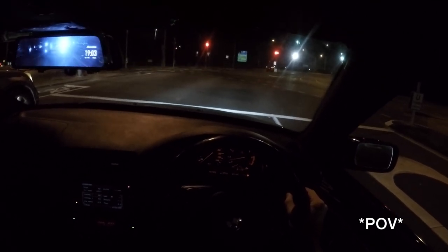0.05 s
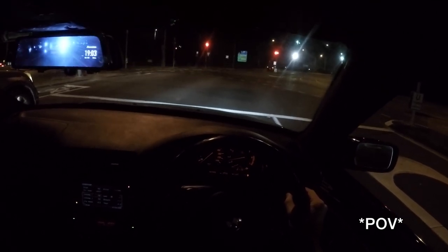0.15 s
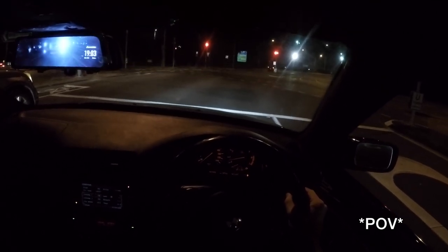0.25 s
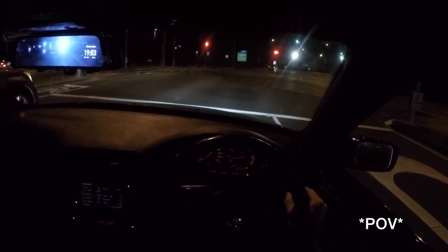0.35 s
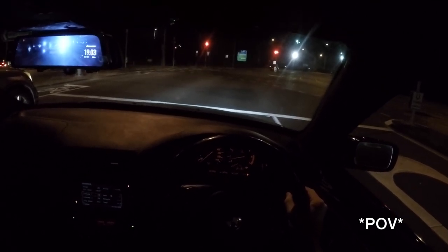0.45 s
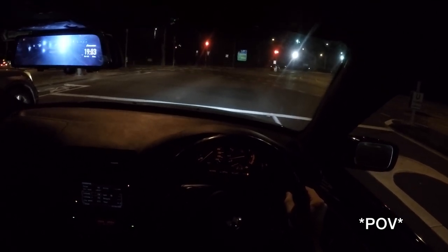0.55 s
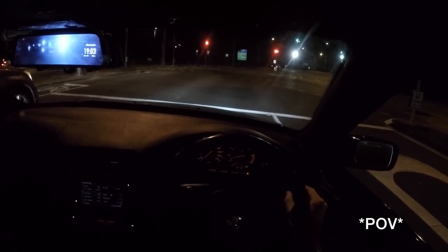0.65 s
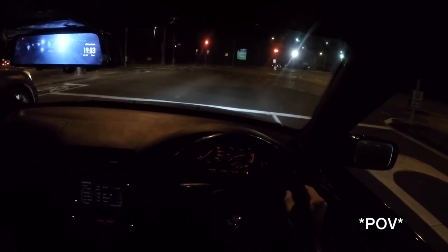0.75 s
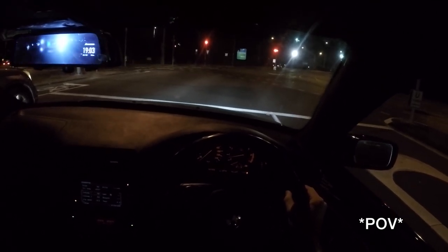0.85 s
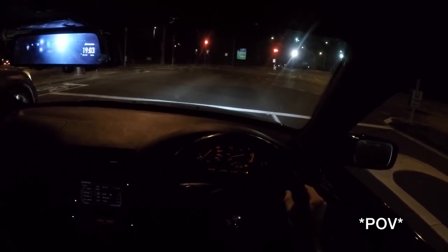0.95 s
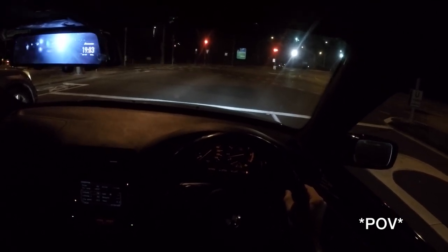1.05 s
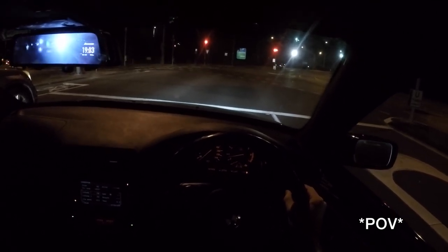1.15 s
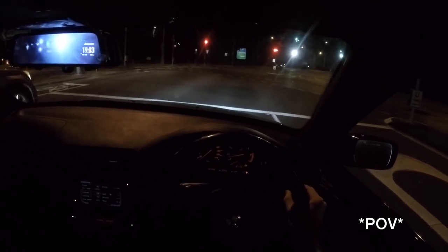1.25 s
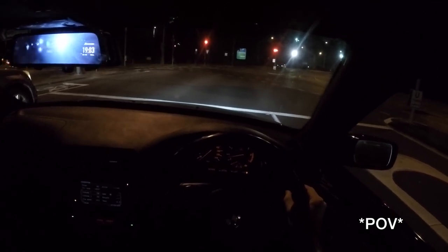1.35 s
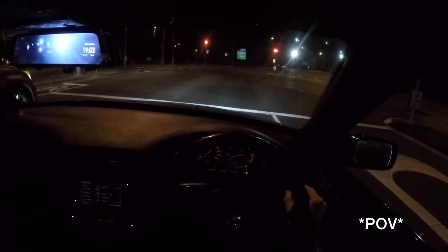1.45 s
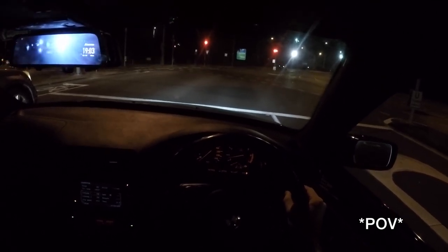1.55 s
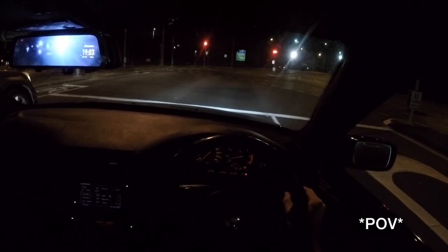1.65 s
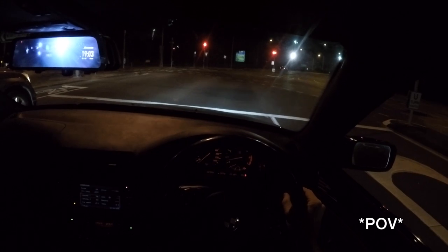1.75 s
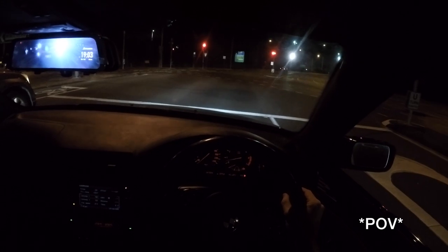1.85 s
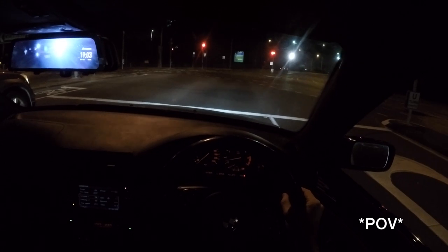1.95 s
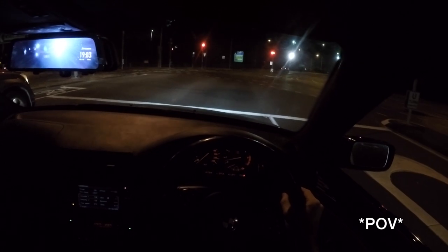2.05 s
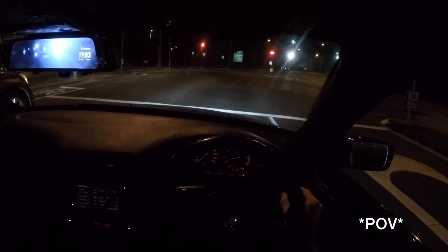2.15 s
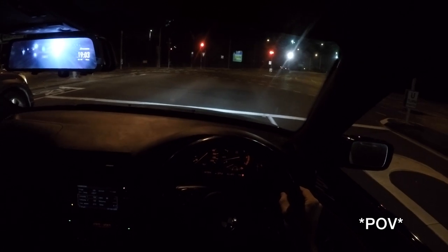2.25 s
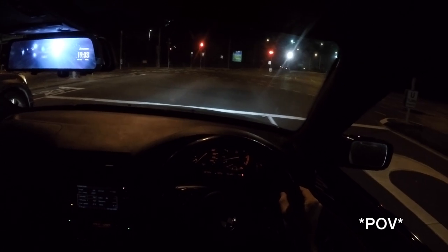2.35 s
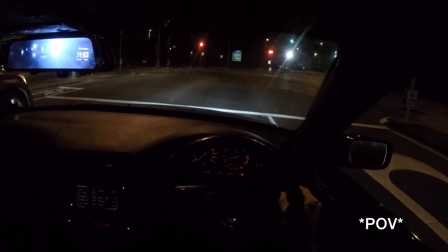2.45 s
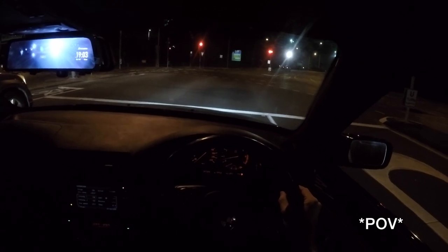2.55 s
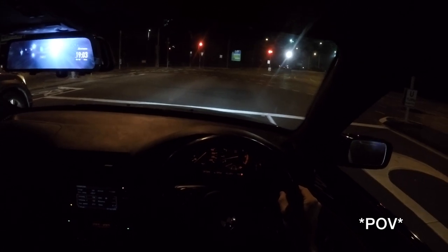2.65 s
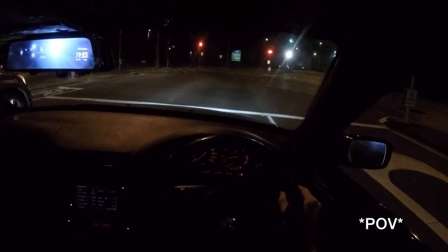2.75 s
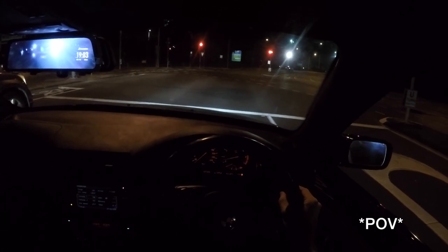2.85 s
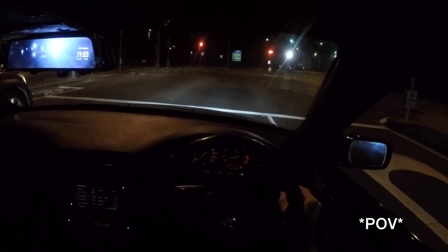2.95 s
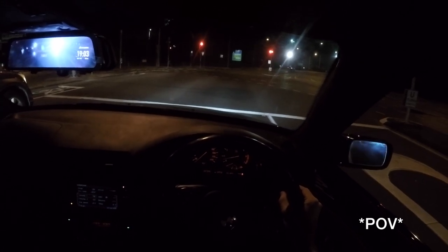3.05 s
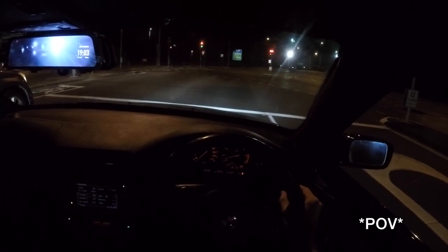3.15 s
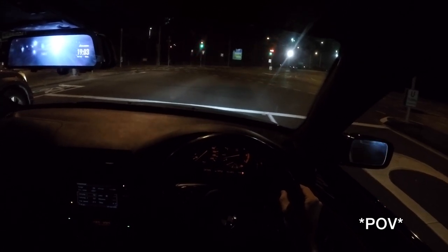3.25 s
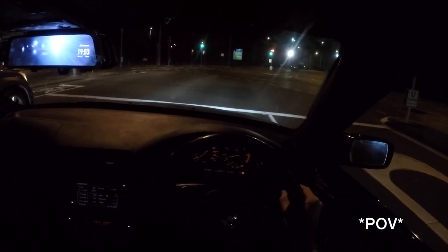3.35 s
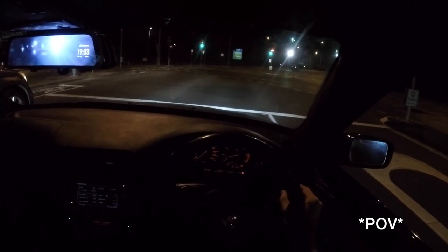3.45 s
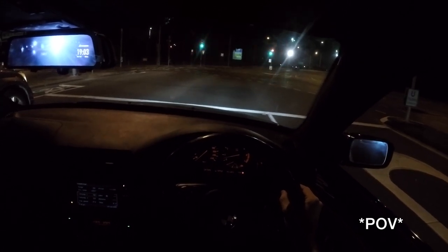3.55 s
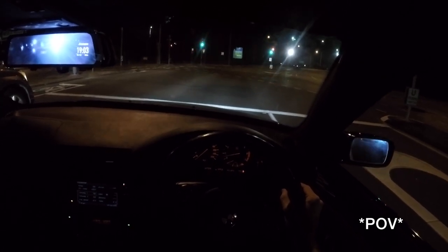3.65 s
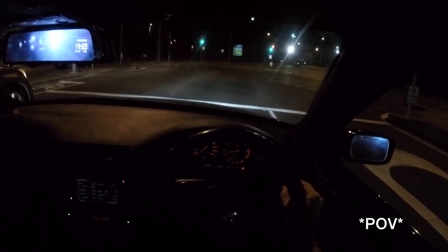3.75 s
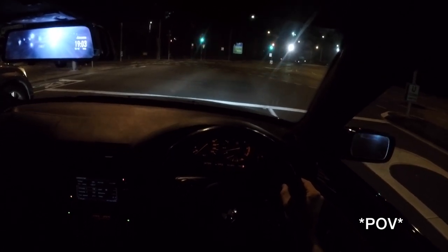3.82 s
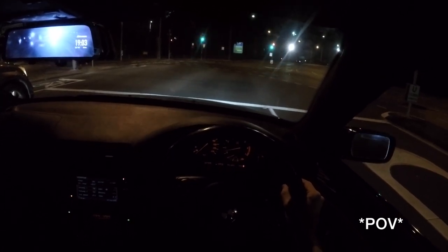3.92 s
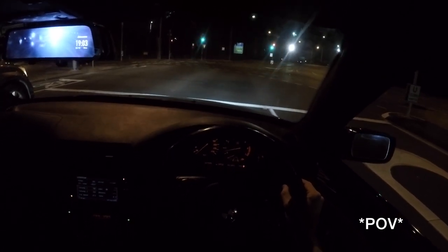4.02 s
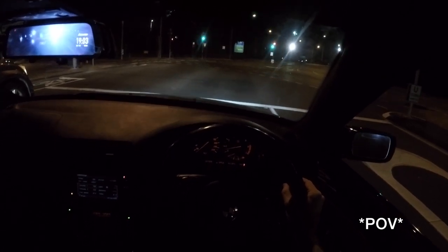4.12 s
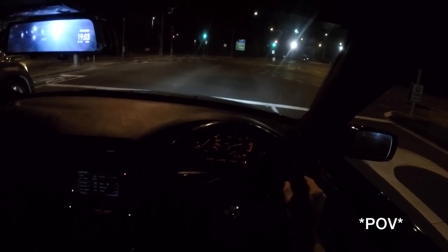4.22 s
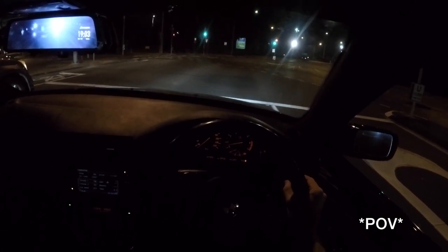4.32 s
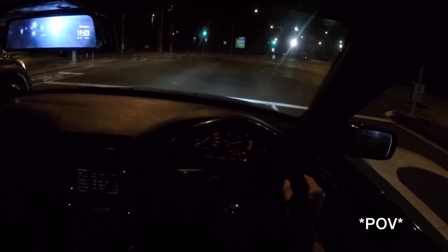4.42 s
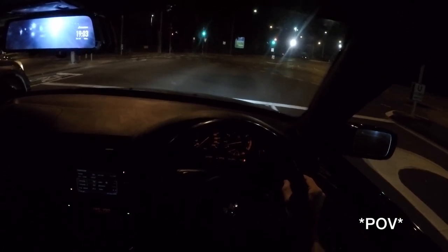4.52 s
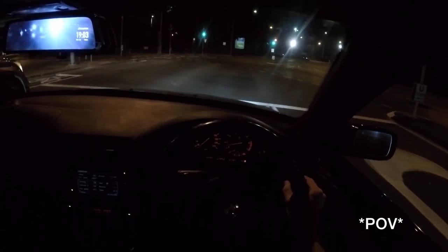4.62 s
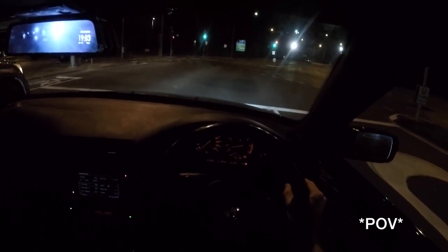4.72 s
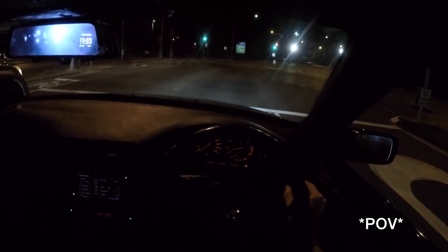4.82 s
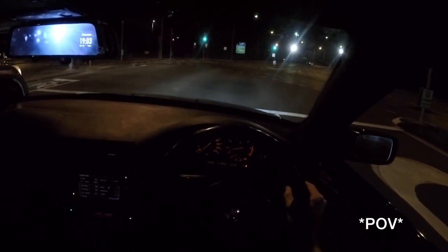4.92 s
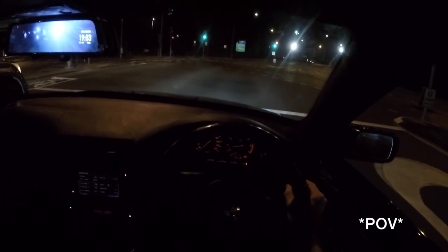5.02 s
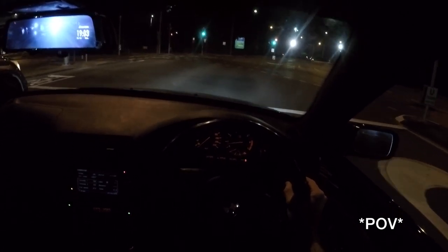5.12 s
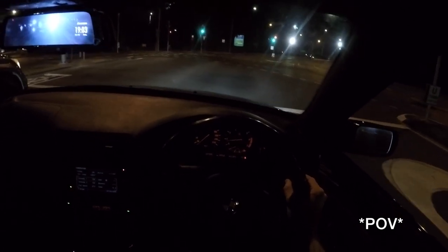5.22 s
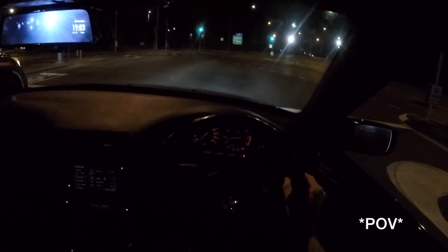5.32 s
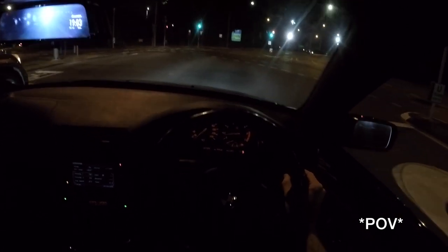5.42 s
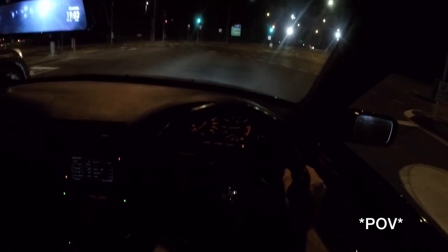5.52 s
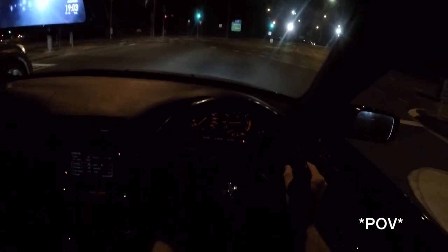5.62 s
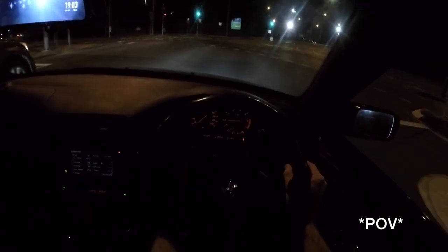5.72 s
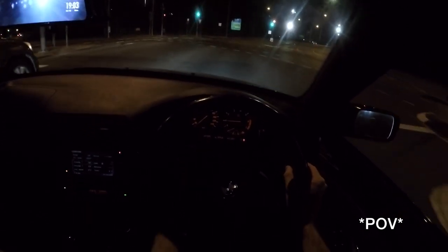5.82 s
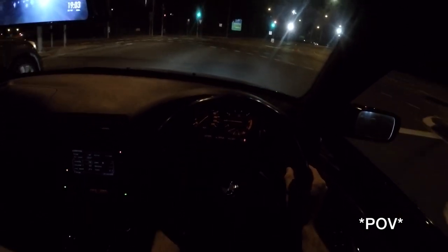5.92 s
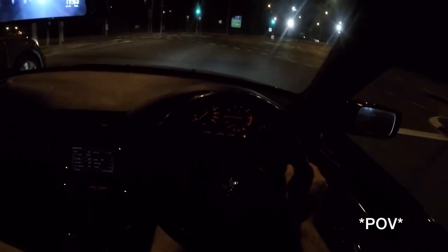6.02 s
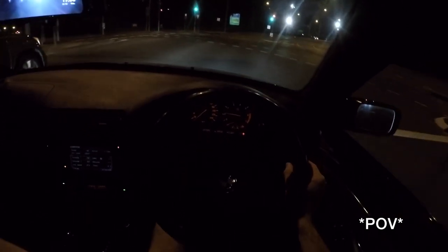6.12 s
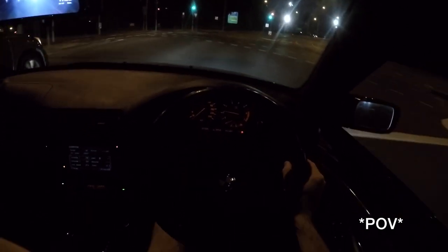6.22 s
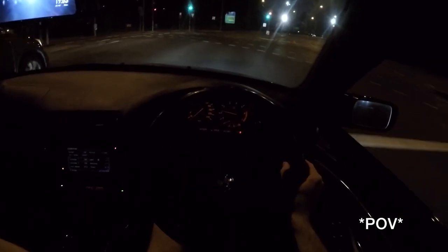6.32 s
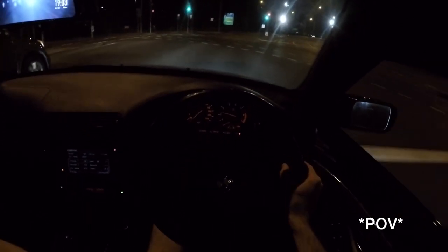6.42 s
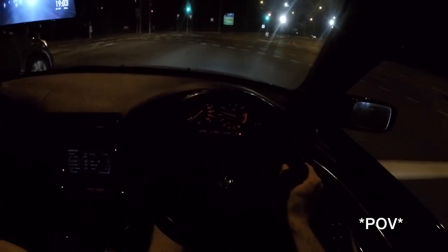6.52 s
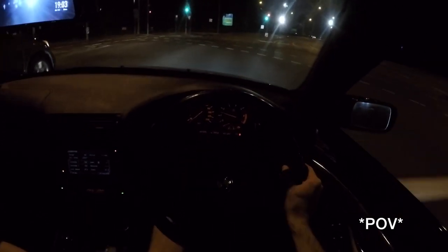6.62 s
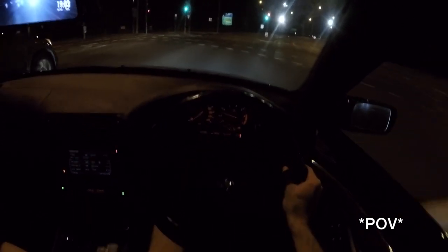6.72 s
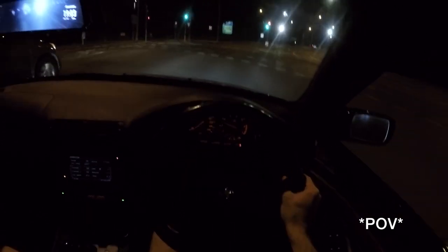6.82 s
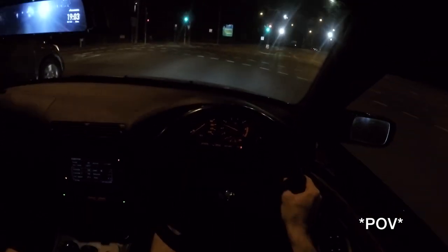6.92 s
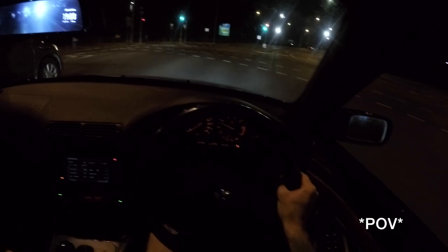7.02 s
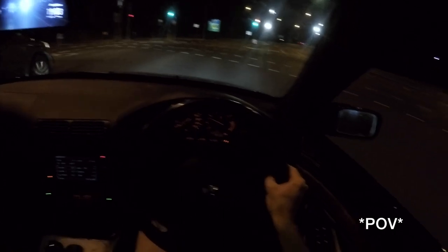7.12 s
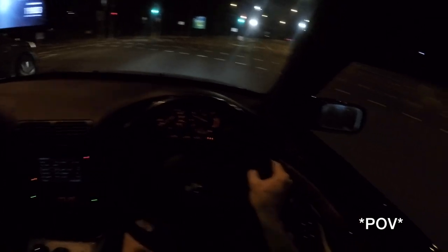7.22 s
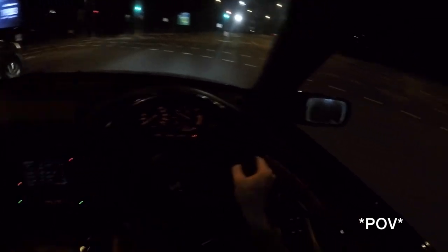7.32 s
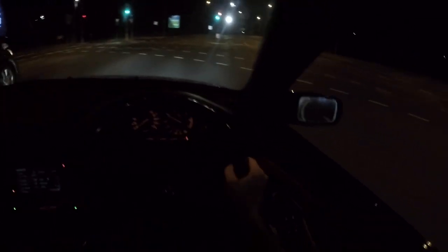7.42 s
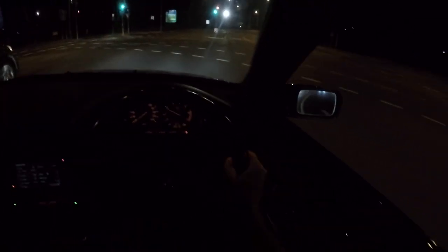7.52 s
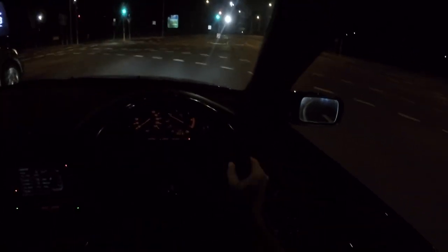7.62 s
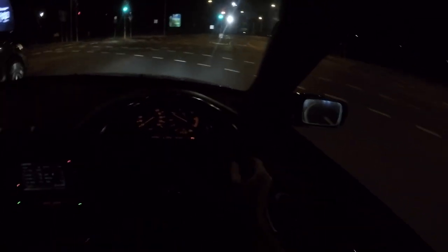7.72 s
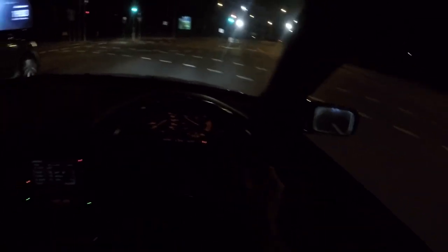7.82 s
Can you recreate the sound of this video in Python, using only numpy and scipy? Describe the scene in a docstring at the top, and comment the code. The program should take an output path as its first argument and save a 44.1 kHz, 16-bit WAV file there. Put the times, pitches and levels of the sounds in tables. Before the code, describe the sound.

A microphone near the driver captures a small, bass-heavy cabin. The engine hums deeply at idle under soft airy hiss. Midway there is a thudding gear clunk, a cloth brush and several crisp clicks. Then the engine revs up, at first smoothly and then strongly, its boom filling the cabin over growing road noise, with plastic ticks, light hand rubbing, hard little taps and a final deep heave over a dip.

```python
"""Inside a car at night. It idles at a red light, amid a faint steady hiss; a gear goes in with a clunk
that rings the body's modes, cloth brushes, trim ticks, and a latch clicks as snap, metal ring and knock.
The car then pulls away with a short narrow hiss of the air intake: the firing tone and its octave glide up
and boom through the cabin response, growl and throttle hiss follow the load, and road noise grows with
speed. Trim ticks on, a hand brushes the wheel, and late on the rumble heaves in dips and the hand taps."""
import sys
import numpy as np
from scipy import signal
from scipy.fft import rfft, irfft
from scipy.io import wavfile
from scipy.ndimage import uniform_filter1d

SR = 44100
rng = np.random.default_rng(int(sys.argv[2]) if len(sys.argv) > 2 else 0)


def pcm_store(signal):
    """Save signal as 16-bit PCM."""
    levels = np.round(np.clip(np.atleast_2d(signal), -1, 1) * 32767)
    wavfile.write(sys.argv[1], SR, levels.astype(np.int16).T)


N = 347067
TIME = np.arange(N) / SR


def undb(db):
    """Logarithmic level: decibels to amplitude gain."""
    return np.exp(np.log(10) / 20 * np.asarray(db))


def control(table):
    """Linear interpolation: a table of (time, value) as one value a sample."""
    times, values = np.transpose(table)
    return np.interp(TIME, times, values)


def response(hz, points):
    """Frequency response: the level in dB of (Hz, dB) points, read on a logarithmic frequency axis."""
    point_hz, point_db = np.transpose(points)
    return np.interp(np.log(hz), np.log(point_hz), point_db)


def colour(x, points):
    """Spectral shaping: multiply the spectrum by the gains of (Hz, dB) points."""
    bin_hz = np.maximum(np.fft.rfftfreq(N, 1 / SR), 1)
    return irfft(rfft(x) * undb(response(bin_hz, points)), N)


def walk(rate):
    """Random modulation: Gaussian knots, rate a second, joined by lines and scaled to unit spread."""
    knots = rng.standard_normal(int(rate * N / SR) + 3)
    return np.interp(TIME * rate, np.arange(len(knots)), knots) * np.sqrt(3 / 2)


def pan(db):
    """Interaural level difference: left and right gains for left minus right in dB."""
    return undb(np.array([[db], [-db]]) / 2)


# Stereo width of cabin noise: (frequency [Hz], side minus mid level [dB])
STEREO_WIDTH = [(60, -12), (130, -17.5), (220, -14.5), (370, -8), (680, 3), (1260, 6), (2300, 0.5),
                (4200, -2.5), (7800, 1)]


def cabin_noise(spectrum):
    """Diffuse field: mid and side noise of a given density; the bass presses on both sides alike."""
    white = rng.standard_normal((2, N)) * np.sqrt(SR / 2)  # unit power per Hz
    mid, side = colour(white, spectrum)
    side = colour(side, STEREO_WIDTH)
    return np.array([mid + side, mid - side])


def ring(modes):
    """Modal synthesis: a struck object's decaying sines, peak 1."""
    t = TIME[:SR // 4]
    total = np.zeros(len(t))
    for k, (hz, db, t60) in enumerate(modes):
        sign = (-1) ** k  # neighbouring modes start in opposite directions
        total += sign * undb(db - 60 * t / t60) * np.sin(2 * np.pi * hz * t)
    return total / np.abs(total).max()


def burst(t60):
    """Exponential decay: stereo noise falling 60 dB in t60 seconds, with unit energy on each side."""
    decay = np.exp(-np.log(1000) * TIME[:SR // 4] / t60)
    noise = rng.standard_normal((2, SR // 4)) * decay
    return noise / np.linalg.norm(noise, axis=1, keepdims=True)


def reflect(x, wet_db, t60):
    """Convolution reverberation: direct sound plus short, dense reflections from glass and seats."""
    impulse_response = undb(wet_db) * burst(t60)
    impulse_response[:, 0] += 1
    return signal.fftconvolve(np.atleast_2d(x), impulse_response, axes=1)


def bandpass(order, edges):
    """Band limitation: a Butterworth filter between two edges in Hz."""
    return signal.butter(order, edges, "bandpass", fs=SR, output="sos")


def add(out, start_s, x):
    """Superposition: mix a sound in at a time."""
    i = int(start_s * SR)
    out[:, i:i + x.shape[1]] += x[:, :N - i]


# The driver's foot: (time [s], engine load [0-1])
ENGINE_LOAD = [(0, 0.3), (3.1, 0.05), (4.1, 0.45), (5, 0.57), (5.42, 0.37), (5.62, 0.81), (5.95, 0.95),
               (7.87, 0.96)]


def engine_load():
    """Forcing function: the engine load through time."""
    return np.clip(control(ENGINE_LOAD), 0, 1)


# Growl of unequal cylinders under load: (frequency [Hz], relative level [dB])
GROWL_SPECTRUM = [(100, -22), (150, -3.5), (200, -6.5), (250, 2.5), (320, -2), (400, -6.5), (480, -10),
                  (580, -14), (750, -29.5), (1100, -31.5), (2000, -51)]


def growl(phase, count=1024):
    """Subharmonic periodicity: eight unequal cylinders repeat a rough pattern, never quite on time."""
    pattern = rng.standard_normal(count)
    unsteady = phase + .35 * walk(30)
    cycle = (unsteady / (2 * np.pi * 8)) % 1  # one pattern every eight firings
    rough = np.interp(cycle * count, np.arange(count), pattern)
    shaped = colour(rough, GROWL_SPECTRUM)
    return shaped / shaped.std()


# Engine speed before the flywheel smooths it: (time [s], firing rate [Hz])
FIRING_RATE = [(0.0, 46.2), (2.1, 45.6), (2.65, 43.5), (3.1, 42.8), (3.55, 47.6), (4.1, 47.9), (4.5, 49.8),
               (5.05, 65.8), (5.33, 70.6), (5.4, 72.3), (5.52, 72.3), (5.85, 95.6), (6.05, 102.6),
               (6.4, 109.8), (6.9, 126.2), (7.25, 132.9), (7.47, 133.5), (7.66, 122.7), (7.87, 122.0)]
# How the cabin's air answers a gliding tone: (frequency [Hz], gain [dB])
CABIN_RESPONSE = [(42.8, -21), (44, -3.5), (45.6, -1), (47.8, -2), (50, -14), (58, -5), (70, -8.5),
                  (76, -6.5), (86, 0), (92, -0.5), (98, 2), (112, 0.5), (126, 1), (134, 2), (140, 3),
                  (143.5, -11.5), (165, -3.5), (198, -8), (215, -16.5), (265, -9.5)]
# Weaker tones of cylinders and belt-driven parts: (multiple of the firing rate [ratio],
# level at idle [dB], level at half load [dB], level at full load [dB])
WEAK_ORDERS = [(.5, -66, -53, -54), (.625, -61, -57, -49), (.75, -61, -60, -51), (.875, -62, -47, -45),
               (1.125, -64, -58, -47), (1.25, -64, -58, -46), (1.375, -66, -56, -51), (1.5, -64, -60, -55),
               (1.625, -66, -52, -59), (1.75, -66, -53, -62), (2.28, -66, -60, -49), (2.625, -68, -63, -61),
               (3, -47, -56, -59), (3.25, -63, -65, -62), (3.5, -57, -52, -58), (4, -62, -58, -68),
               (4.56, -72, -66, -69), (4.75, -68, -63, -71), (5.125, -72, -66, -77), (6.19, -68, -72, -84),
               (7.16, -67, -71, -90), (7.82, -64, -80, -95), (10.41, -70, -88, -99), (11.41, -70, -86, -99)]
# Body shake, before its level follows the load: (frequency [Hz], spectral level [dB])
SHAKE_SPECTRUM = [(10, -78.5), (20, -67), (33, -66), (55, -67), (80, -70.5), (140, -66.5), (200, -77),
                  (260, -76.5), (335, -78), (358, -77), (395, -87), (480, -92), (520, -87.5), (560, -93.5),
                  (740, -101), (950, -112), (2500, -126)]
FLYWHEEL_S = .13  # the flywheel rounds off changes of speed
# Boom of the firing tone and its octave, before the cabin response: level off load, gain at full load
FIRING_DB, FIRING_LOAD_DB = -38, 16.5
OCTAVE_DB, OCTAVE_LOAD_DB = -39.2, 2.5
BOOM_POWER = 4  # the boom sets in only near full load
# The belt turns the alternator: its hum as a multiple of the firing rate
ALTERNATOR_ORDER = 6.84
# The hum is loudest when sagging idle speed brings it onto a panel resonance
ALTERNATOR_DB, PANEL_HZ, PANEL_WIDTH_HZ = -49, 298.3, 15.3
ALTERNATOR_FLOOR_DB = -59  # least hum level up to the panel resonance; above it this floor falls
GROWL_DB, GROWL_LOAD_DB = -69, 20.5  # level off load, gain at full load
INTAKE_HZ, INTAKE_WIDTH_HZ, INTAKE_DB = 260, 20, -4  # air intake resonance, gain at full load
SHAKE_DB, SHAKE_LOAD_DB = 1, 2  # gain off load, further gain at full load


def engine(load):
    """Harmonic forcing: tones locked to the crankshaft, a growl, and a shake that pulses with the firings."""
    hz = uniform_filter1d(control(FIRING_RATE), int(FLYWHEEL_S * SR), mode="nearest")
    phase = 2 * np.pi * np.cumsum(hz) / SR

    def tone(multiple, db, waver_db, slip):
        """Phase modulation: uneven combustion makes an order's level and phase waver."""
        angle = multiple * phase + slip * walk(14) + rng.uniform(0, 2 * np.pi)
        return np.sqrt(2) * undb(db + waver_db * walk(14)) * np.sin(angle)

    boom_load = load ** BOOM_POWER
    firing_db = FIRING_DB + FIRING_LOAD_DB * boom_load + response(hz, CABIN_RESPONSE)
    octave_db = OCTAVE_DB + OCTAVE_LOAD_DB * boom_load + response(2 * hz, CABIN_RESPONSE)
    boom = tone(1, firing_db, waver_db=.5, slip=0.046) + tone(2, octave_db, waver_db=1.1, slip=0.03)

    weak = np.zeros(N)
    for multiple, *levels_db in WEAK_ORDERS:
        order_db = np.interp(load, [.1, .5, 1], levels_db)
        slip = .08 + (.22 + .15 * multiple) * load ** 2
        weak += tone(multiple, order_db, waver_db=1 + 1.6 * load, slip=slip)

    hum_hz = ALTERNATOR_ORDER * hz
    detuning = 2 * (hum_hz - PANEL_HZ) / PANEL_WIDTH_HZ
    resonant_db = ALTERNATOR_DB - 10 * np.log10(1 + detuning ** 2)
    floor_db = ALTERNATOR_FLOOR_DB - 45 * np.log10(np.maximum(hum_hz / PANEL_HZ, 1))
    hum = tone(ALTERNATOR_ORDER, np.maximum(resonant_db, floor_db), waver_db=.7, slip=.04)

    growl_db = GROWL_DB + GROWL_LOAD_DB * load ** 2 + 3.0 * walk(11)
    rasp = weak + growl(phase) * undb(growl_db)
    # each order swells as it glides through the intake resonance
    b, a = signal.iirpeak(INTAKE_HZ, INTAKE_HZ / INTAKE_WIDTH_HZ, fs=SR)
    intake = signal.lfilter(b, a, rasp) * undb(INTAKE_DB) * load

    shake_db = SHAKE_DB + SHAKE_LOAD_DB * load + .5 * walk(6.1)
    shake = cabin_noise(SHAKE_SPECTRUM) * undb(shake_db) * (1 + 0.06 * np.cos(phase))
    return boom * pan(0.81) + rasp * pan(-.5) + (hum + intake) * pan(-1.8) + shake * pan(-0.33)


# Air past the throttle plate at full load: (frequency [Hz], spectral level [dB per Hz])
THROTTLE_SPECTRUM = [(1200, -122), (2000, -110), (2700, -110.5), (3800, -120), (6000, -137)]


def throttle(load):
    """Turbulent flow noise: air hisses past the throttle plate as it opens."""
    return cabin_noise(THROTTLE_SPECTRUM) * load


# Ventilation and microphone hiss: (frequency [Hz], spectral level [dB per Hz])
AIR_SPECTRUM = [(200, -92), (550, -96.5), (740, -93.5), (950, -103), (1200, -100.5), (1800, -107),
                (3500, -112), (4900, -116), (5300, -114.5), (5650, -110), (6600, -112.5), (10000, -114.5),
                (12000, -123), (14000, -134)]


def air():
    """Stationary broadband noise: the steady faint hiss of ventilation and microphone."""
    return cabin_noise(AIR_SPECTRUM) * pan(-0.54)


# Driveline judders as the gear engages: (time [s], peak level before reflections [dB], contact time [s])
GEAR_JOLTS = [(3.704, -36, .0008), (3.720, -26.5, 0.0011), (3.734, -25, 0.0019), (3.749, -22.5, 0.0022),
              (3.767, -23, 0.0037), (3.784, -25, 0.003), (3.826, -20, .008), (3.921, -30.5, 0.0045)]
# Body modes, also rung by the latch: (frequency [Hz], relative level [dB], 60 dB decay time [s])
BODY_MODES = [(64.6, -0.5, 0.069), (95.7, -2.5, 0.18), (119, 7, 0.075), (144, -1, 0.12), (171.2, 3, 0.1),
              (217.4, -0.5, 0.1), (290, 1, 0.064), (337, -9.5, 0.089), (462, -14, 0.11), (572, -18, 0.057),
              (664, -23, 0.058), (1200, -46, .03)]
# Loose fittings: band, level relative to the knock at a 1 ms contact, decay
RATTLE_HZ, RATTLE_DB, RATTLE_T60_S = [260, 600], -19, 0.22


def gear_clunk():
    """Impact excitation: driveline slack is taken up in knocks; longer contacts ring lower and rattle less."""
    out, t = np.zeros((2, N)), TIME[:SR // 20]
    band = bandpass(3, RATTLE_HZ)
    for start_s, db, contact_s in GEAR_JOLTS:
        force = t * np.exp(-4 * t / contact_s)
        blow = signal.fftconvolve(ring(BODY_MODES), force)
        blow /= np.abs(blow).max()
        add(out, start_s, undb(db) * reflect(blow, wet_db=-17, t60=0.16))

        rattle = signal.sosfilt(band, burst(RATTLE_T60_S)[:1])
        rattle /= np.abs(rattle).max()
        hardness = np.sqrt(.001 / contact_s)
        rattle_gain = undb(db + RATTLE_DB) * hardness
        add(out, start_s, rattle_gain * reflect(rattle, wet_db=-6, t60=.08))
    return out


# Brushes of hand and sleeve, and at 5.12 s a short narrow hiss of the air intake: (time [s], length [s],
# level before the fades [dB], centre frequency [Hz], half width relative to the centre [ratio])
BRUSHES_AND_HISS = [(3.82, .14, -68, 1300, .35), (5.12, .11, -71, 2700, .08),
                    (5.992, .075, -63.5, 1640, 0.1), (6.033, 0.026, -62.5, 2000, 0.42),
                    (6.602, 0.063, -74, 5960, 0.31), (6.99, 0.0351, -72.5, 5500, 0.38),
                    (7.172, 0.032, -63.5, 5430, 0.4), (7.234, .13, -67, 1700, 0.54),
                    (7.287, .045, -68, 4900, 0.46), (7.337, .02, -67, 5000, .44),
                    (7.527, .16, -66.5, 1490, 0.09)]


def brushes_and_hiss():
    """Band-limited friction and flow noise: grainy swishes, dull squeaks and one short intake hiss."""
    out = np.zeros((2, N))
    for start_s, length_s, db, centre_hz, width in BRUSHES_AND_HISS:
        n = int(length_s * SR)
        grains = rng.standard_normal((2, n)) * undb(2.5 * rng.exponential(size=n))
        edges = centre_hz * (1 + np.clip(width, .05, .8) * np.array([-1, 1]))
        swish = signal.sosfilt(bandpass(2, edges), grains)
        swish /= swish.std()
        add(out, start_s, undb(db) * swish * signal.windows.tukey(n, .5))
    return out


# Plastic trim modes, also the latch housing's: (frequency [Hz], relative level [dB], 60 dB decay time [s])
TRIM_MODES = [(513, 1, 0.052), (684, 7, 0.016), (955, -0.5, 0.024), (1232, 0, 0.021), (1433, -5, 0.021),
              (1772, -5, 0.021), (2040, -8.5, 0.018), (2850, -12.5, 0.015)]
# Trim ticks: (time [s], peak level before panning and reflections [dB], left minus right level [dB])
TRIM_TICKS = [(3.9205, -53, -4), (4.022, -56, -2), (5.6815, -40.5, -4), (5.729, -52, -2), (5.8092, -44, 0),
              (6.040, -49, 2), (7.2479, -46, -1), (7.3442, -50, -1)]


def trim():
    """Modal response: plastic panels tick as the body flexes."""
    out = np.zeros((2, N))
    for start_s, db, pan_db in TRIM_TICKS:
        tick = reflect(ring(TRIM_MODES), wet_db=2.0, t60=0.047)
        add(out, start_s, undb(db) * pan(pan_db) * tick)
    return out


# Latch clicks, gains before reflections: (time [s], metal ring [dB], snap [dB], knock of the housing [dB],
# lag of the knock [s])
LATCH_CLICKS = [(4.053, -37.5, -22.5, -42, .003), (4.0995, -37, -24.5, -44, .012),
                (4.1406, -48.5, -32.5, -46, .004), (4.2875, -58, -28.5, -44, .003)]
# Metal latch modes: (frequency [Hz], relative level [dB], 60 dB decay time [s])
LATCH_MODES = [(2550, -8, .02), (3280, -11, .024), (4850, -10, .018), (5740, -6, .024), (5932, -3, .04),
               (6040, 0, .05), (6168, -3, .04), (6342, -4, .04), (6680, -8, .02), (6950, -7, .022),
               (7168, -5, .035), (7400, -5, .025), (7650, -6, .02), (7886, -6, .022), (8450, -12, .02),
               (9200, -13, .018)]
CRACK_HZ, CRACK_T60_S = [1300, 7400], .028  # the dry snap: band, decay
THUD_DB = 10  # the body's thud, relative to the knock of the latch housing


def latch():
    """Coupled impact: a bright snap rings the metal pawl, then its housing knocks and thuds into the body."""
    out = np.zeros((2, N))
    band = bandpass(3, CRACK_HZ)
    for start_s, metal_db, crack_db, knock_db, lag_s in LATCH_CLICKS:
        crack = signal.sosfilt(band, burst(CRACK_T60_S))
        # the pawl scrapes for a few milliseconds, so each click favours other modes
        scrape = burst(t60=.011)
        metal = signal.fftconvolve(scrape, ring(LATCH_MODES)[None], axes=1)[:, :SR // 4]
        click = undb(crack_db) * crack + undb(metal_db) * metal
        add(out, start_s, reflect(click, wet_db=-2, t60=.115))

        knock = reflect(ring(TRIM_MODES), wet_db=2, t60=.11)
        add(out, start_s + lag_s, undb(knock_db) * knock)
        thud = reflect(ring(BODY_MODES[4:]), wet_db=-14, t60=0.12)  # without the four lowest modes
        add(out, start_s + lag_s, undb(knock_db + THUD_DB) * thud)
    return out * pan(-1.9)


# Tyre rumble before it follows the speed: (frequency [Hz], spectral level [dB])
ROAD_SPECTRUM = [(10, -66.5), (25, -51.5), (42, -54.5), (70, -67.5), (120, -53.5), (200, -68), (300, -66),
                 (450, -81), (720, -93.5), (950, -94), (1400, -99), (2000, -104), (3000, -108),
                 (5000, -116), (9000, -130)]
# Dips in the asphalt: (time of the middle [s], half length [s], gain of the deep rumble [dB])
ROAD_DIPS = [(6.659, 0.16, 3.5), (7.352, .14, 7)]
DIP_TOP_HZ = 60
# The car gains speed evenly: start, gain one second later, power of speed that the rumble follows
ROLLS_S, ROAD_DB, ROAD_POWER = 4.62, -10, 0.77


def road():
    """Random roughness excitation: tyre rumble grows with speed and swells; the body heaves through dips."""
    rolling_s = np.maximum(TIME - ROLLS_S, 0)
    roughness = undb(ROAD_DB + walk(11))
    rumble = cabin_noise(ROAD_SPECTRUM) * rolling_s ** ROAD_POWER * roughness * pan(-0.29)
    lowpass = signal.butter(2, DIP_TOP_HZ, fs=SR, output="sos")
    heave = signal.sosfiltfilt(lowpass, rumble)
    extra = np.zeros(N)
    for middle_s, length_s, db in ROAD_DIPS:
        extra += (undb(db) - 1) * np.exp(-((TIME - middle_s) / length_s) ** 2)
    return rumble + heave * extra


# Hard taps on the wheel: (time [s], gain before band limiting and reflections [dB])
WHEEL_TAPS = [(7.1705, -29.5), (7.1865, -30.5), (7.3075, -41)]
TAP_HZ, TAP_T60_S = [2500, 7600], .018  # band, decay


def taps():
    """Short impacts: small, hard, bright ticks as the hand shifts its grip on the wheel."""
    out = np.zeros((2, N))
    band = bandpass(3, TAP_HZ)
    for start_s, db in WHEEL_TAPS:
        tap = signal.sosfilt(band, burst(TAP_T60_S))
        add(out, start_s, undb(db) * reflect(tap, wet_db=-3, t60=.06))
    return out


def scene():
    """Superposition: everything as heard from the driver's seat."""
    load = engine_load()
    steady = engine(load) + throttle(load) + air()
    return steady + gear_clunk() + brushes_and_hiss() + trim() + latch() + road() + taps()


BOTTOM_HZ, TOP_HZ = 12, 14200


def record(dry):
    """Band limitation: a gentle high-pass thins the deepest rumble and a steep low-pass cuts the top."""
    highpass = signal.butter(2, BOTTOM_HZ, "highpass", fs=SR, output="sos")
    lowpass = signal.ellip(8, .2, 70, TOP_HZ, fs=SR, output="sos")
    return signal.sosfilt(lowpass, signal.sosfilt(highpass, dry))


dry = scene()
out = record(dry)
pcm_store(out)
```